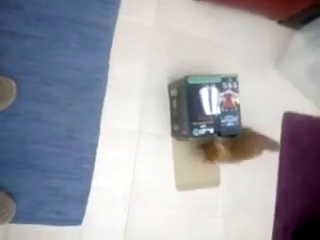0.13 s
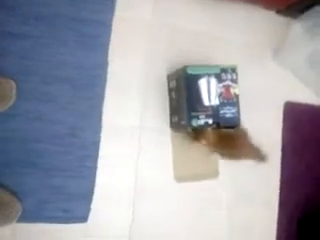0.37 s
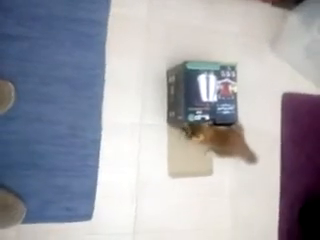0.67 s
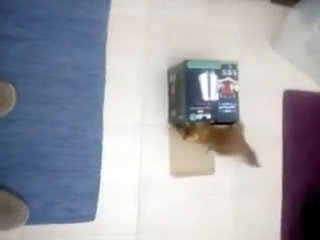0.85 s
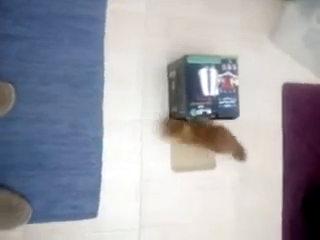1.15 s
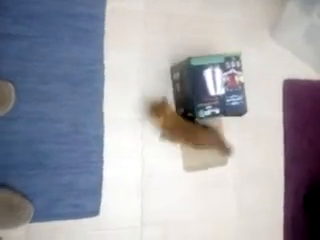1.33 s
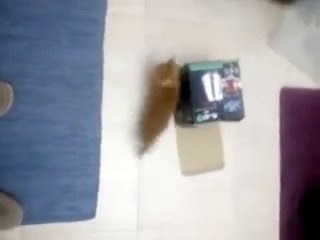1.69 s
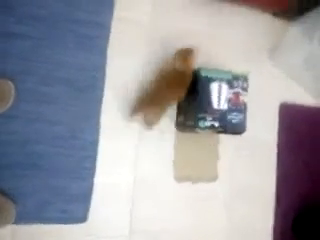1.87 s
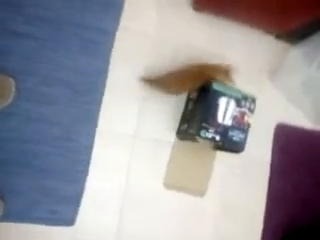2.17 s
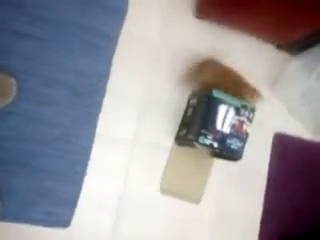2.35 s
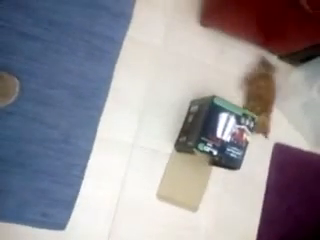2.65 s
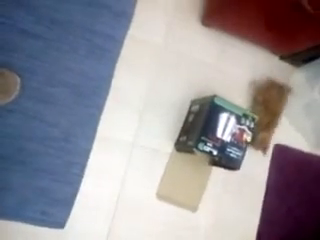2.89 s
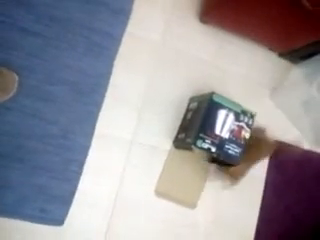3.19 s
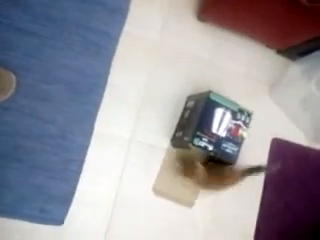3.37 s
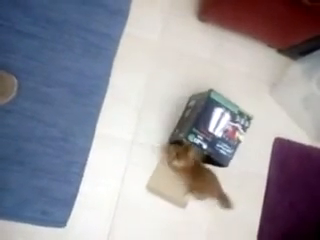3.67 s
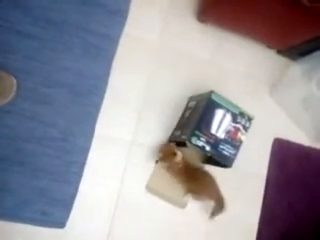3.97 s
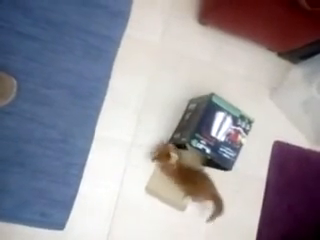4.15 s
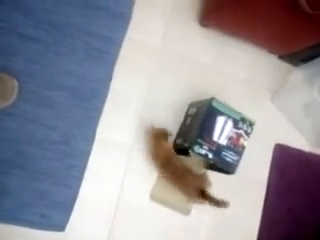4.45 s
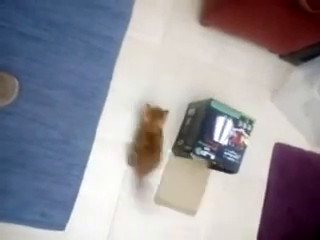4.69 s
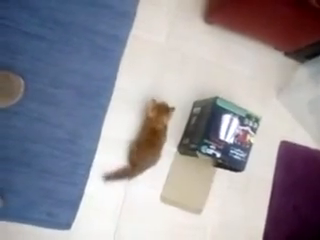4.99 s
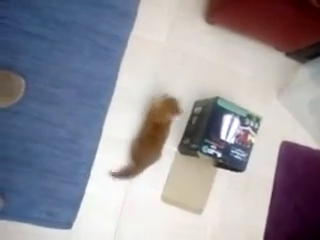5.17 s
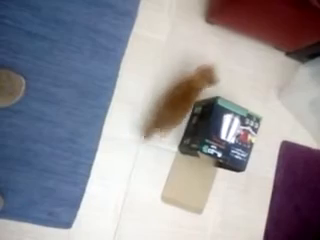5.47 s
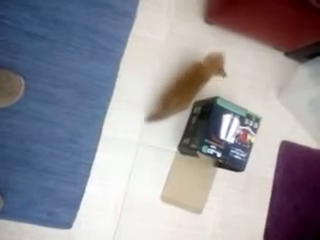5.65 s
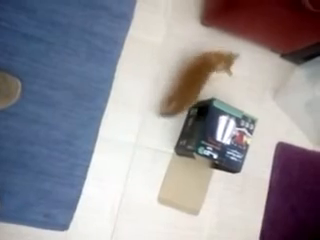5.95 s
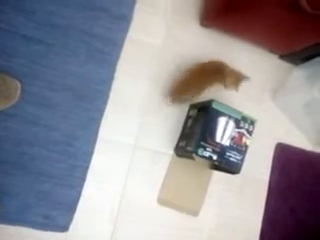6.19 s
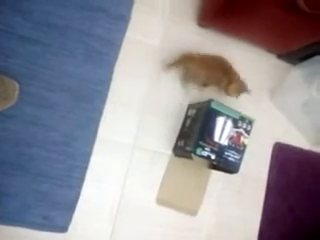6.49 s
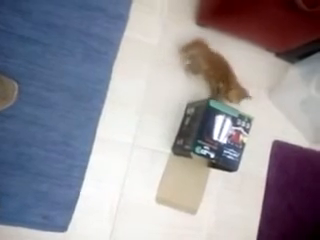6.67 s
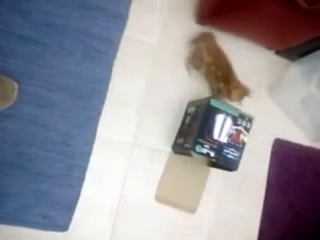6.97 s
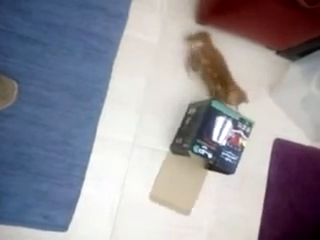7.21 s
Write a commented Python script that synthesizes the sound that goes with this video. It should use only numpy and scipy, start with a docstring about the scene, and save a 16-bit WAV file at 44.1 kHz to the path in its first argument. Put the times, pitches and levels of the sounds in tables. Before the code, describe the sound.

In a quiet tiled room, a kitten bats a hollow cardboard box: soft thumps, sharp claw ticks and papery scrapes for about two seconds. A faint rustle passes on the left, then near-silence, then a dense, louder flurry of knocks and scratches, followed by looser taps. After another pause come two short final bursts. A hand-held microphone a short way above catches low hum, faint hiss and slight room echoes.

```python
"""A kitten circles a cardboard box on a tiled floor, a short way below a hand-held camera; the room hums quietly.
For two seconds paws thump the panels, claws tick and knock the edges, and card and fur scrape along.
A soft rustle passes on the left, then come a dense flurry and a looser one, a pause, and two last short bursts.
Blows ring modes of the box, strokes are dense random slips, and hum, rustle and hiss are shaped noise.
Sparse echoes from tiles and walls follow the box."""
import sys
import numpy as np
from scipy import signal
from scipy.fft import rfft, irfft, next_fast_len
from scipy.io import wavfile
from scipy.ndimage import uniform_filter1d

SR = 44100
rng = np.random.default_rng(int(sys.argv[2]) if len(sys.argv) > 2 else 0)


def store_wav(level_fs):
    """Save 16-bit WAV to argv[1]."""
    pcm = np.round(np.clip(np.atleast_2d(level_fs), -1, 1) * 32767)
    wavfile.write(sys.argv[1], SR, pcm.T.astype(np.int16))


N = 323253  # length in samples

# Spectrum of card, fur and paw friction: hz, level_db (per Hz, relative)
FRICTION_SPECTRUM = [(410, -0.5), (700, -3.5), (954, 3), (1070, 6.5), (1300, 4.5), (1770, 2.5), (2190, 8),
                     (2920, 4.5), (4750, 2.5), (6020, 1), (8010, -8.5), (12000, -14.5), (15600, -68),
                     (22000, -120)]
# Modes of the box, from deep boom over panels to stiff edges:
# hz, level_db (relative), t60_s (before damping), gain_db (added in full when the box stands free)
BOX_MODES = [(112, -11, 0.2, -5), (129.1, 1, 0.31, -3), (150.4, -0.5, 0.15, -7), (182, -1, 0.38, -3),
             (229.3, 4, 0.17, 5), (246.2, -1, 0.1, 2), (302, -4.5, 0.096, -7), (346, 4.5, 0.14, 4),
             (370.6, 1, 0.18, -1.5), (401.4, 0.5, 0.16, -8), (429, -2, 0.11, 0), (455.8, 6.5, 0.14, -2),
             (486, -5.5, 0.06, 2), (567, 0, 0.084, 4), (670, -7, 0.031, -8), (750.3, -6, 0.023, -12),
             (850, -9, 0.1, -5), (928, 2.5, 0.065, -19.5), (1043, -4, 0.13, 2), (1200, 2.5, 0.043, -3),
             (1450, 2.5, 0.049, -0.5), (1645, 3, 0.045, -5), (1864, 2.5, 0.053, -7.5),
             (1987, 0, 0.062, -13), (2144, 4.5, 0.053, 2.5), (2417, 7, 0.036, -3), (2748, 10, 0.035, -3.5),
             (3070, -3.5, 0.075, 11), (3796, 12.5, 0.04, -3), (4340, 18, 0.04, -12), (4700, 17, 0.035, -2)]
PANELS_FROM_HZ, EDGES_FROM_HZ = 250, 750


def gain_of(db):
    """Turns decibels into an amplitude factor."""
    return 10 ** (np.asarray(db) / 20)


def evened(x):
    """Scales a signal to an RMS of one."""
    return x / np.sqrt(np.mean(x ** 2) + 1e-20)


def read(points, hz):
    """Reads a curve between its points, along a logarithmic frequency axis."""
    point_hz, value = np.transpose(points)
    return np.interp(np.log(hz + 1), np.log(point_hz + 1), value)


def coloured(x, points, tilt_db=0):
    """Gives x a spectrum, leaned around 3.5 kHz by tilt_db per octave, at an RMS of one."""
    hz = np.fft.rfftfreq(len(x), 1 / SR)
    lean_db = tilt_db * np.log2((hz + 100) / 3500)
    return evened(irfft(rfft(x) * gain_of(read(points, hz) + lean_db), len(x)))


def hum():
    """Room tone and microphone hiss: random short-time spectra with faint drifting patches."""
    # Room tone and hiss: hz, level_db (per Hz, relative)
    hum_spectrum = [(32, -54), (55, 7.5), (119, 1), (144, -18), (174, -2.5), (344, -8.5), (474, -7),
                    (528, -11), (667, -11.5), (742, -12), (9000, -24.5), (11700, -82), (19800, -120)]
    # Likeness of the two ports: hz, left_right_likeness (-1 to 1)
    hum_likeness = [(60, 0.93), (180, 0.39), (550, 0.37), (1650, -0.35), (4970, -0.034), (15000, 0.15)]
    level_db, patch_db = -58, .9
    frames, hz = N // 256 + 5, np.fft.rfftfreq(1024, 1 / SR)
    a, b, c, d, patches = rng.standard_normal((frames, 513, 5)).T
    patches = uniform_filter1d(patches, 12, 0)  # smooth across frequency
    patches = evened(uniform_filter1d(patches, 14, 1))  # smooth along time
    same = read(hum_likeness, hz)[:, None]
    left = a + 1j * b
    right = same * left + np.sqrt(1 - same ** 2) * (c + 1j * d)
    spectra = np.array([left, right]) * gain_of(read(hum_spectrum, hz)[:, None] + patch_db * patches)
    noise = signal.istft(spectra, nperseg=1024, noverlap=768)[1][:, :N]
    return gain_of(level_db) * evened(noise)


def rustle():
    """A soft wide rustle from the left, like a shoe shifting on a rug: fibre noise partly alike in both ports."""
    # Swell and fade of the rustle: time_s, level_db (before panning)
    rustle_envelope = [(2.09, -66), (2.11, -59), (2.162, -51), (2.43, -50), (2.554, -64.5), (2.56, -80)]
    # Colour of the fibre noise: hz, level_db (per Hz, relative)
    rustle_spectrum = [(150, -16), (400, 2.5), (750, -1), (1200, -10.5), (2600, -10.5), (4500, -12.5),
                       (6500, -14.5), (9000, -14.5), (13000, 4.5), (15000, -20)]
    pan_db, same = 3, .48  # left against right; share of power common to both ports
    s, db = np.transpose(rustle_envelope)
    t = np.arange(N) / SR
    shared, left, right = (coloured(noise, rustle_spectrum) for noise in rng.standard_normal((3, N)))
    ports = np.sqrt(same) * shared + np.sqrt(1 - same) * np.array([left, right])
    return ports * gain_of(np.interp(t, s, db, -120, -120) + pan_db * np.array([[.5], [-.5]]))


def room(x):
    """Sparse echoes of random sign from tiles and walls, each band dying at its own speed."""
    # Decay of the room: hz, t60_s, level_db (relative)
    room_decay = [(100, 0.34, -6), (400, 0.28, -6.5), (990, 0.28, 0.5), (2200, 0.21, -1), (4500, 0.1, -2),
                  (9000, 0.19, 0.5)]
    taps = np.zeros((2, SR // 2))
    slots = np.arange(200, SR // 2 - 20, 20)
    at = slots + rng.integers(0, 20, (2, len(slots)))  # one echo somewhere in each slot
    np.put_along_axis(taps, at, rng.choice([-1., 1.], at.shape), 1)
    hz, t, z = signal.stft(taps, SR, nperseg=256)
    same = 1 / (1 + (hz[:, None] / 500) ** 4)  # long waves reach both ports alike
    z = np.array([z[0], same * z[0] + np.sqrt(1 - same ** 2) * z[1]])
    t60, db = (read(np.array(room_decay)[:, [0, k]], hz)[:, None] for k in (1, 2))
    tail = signal.istft(z * gain_of(db - 60 * t / t60), SR, nperseg=256)[1]
    tail = tail / np.linalg.norm(tail[0])
    return signal.fftconvolve(x[1:], tail, axes=1)[:, :N]  # fed by the right port


def place(x):
    """Two microphone ports: the camera body colours both and shifts the phase of the left one."""
    # How the ports hear the box: hz, right_db, left_db (against right), left_lead_radians
    port_response = [(100, -8.5, -1, 0.25), (423, 0, 2.5, 0.62), (774, 3, 1, -1.5), (1250, -2, -10.5, -1.5),
                     (1540, -0.1, -10.5, -0.5), (1950, -3.5, 4.5, -1), (2690, 0, -7.5, -2),
                     (3400, 1, -1, -0.5), (3516, 5, -16, -4), (5000, 3.5, -2, -6), (5340, 6, -9, -7.5),
                     (6700, -3, 8.5, -6.5), (8000, -7, 10, -6)]
    size = next_fast_len(N + 4096)
    hz = np.fft.rfftfreq(size, 1 / SR)
    port_hz, right_db, left_db, lead = np.transpose(port_response)
    left, right = rfft(x, size) * gain_of(np.interp(hz, port_hz, right_db))
    left = left * gain_of(np.interp(hz, port_hz, left_db))
    left = left * np.exp(1j * np.interp(hz, port_hz, lead))
    return irfft(np.array([left, right]), size)[:, :N]


def kitten(s):
    """Delay, balance and freedom of the box at one moment, read along the kitten's path."""
    # The path: time_s, left_delay_ms (extra), pan_db (left against right), box_freedom (0-1)
    kitten_path = [(0.1, 0.02, 0.5, 0.66), (0.28, 0.022, 1, 0), (0.45, 0.025, -1.2, 0),
                   (0.82, 0.014, 0.5, 0), (1.2, 0.034, -0.2, 0.26), (1.8, -0.0066, -0.1, 0.5),
                   (3.17, 0.027, 0, 0.26), (3.25, -0.011, -1.3, 0), (3.45, 0.033, -1, 0),
                   (3.52, 0.026, -0.3, 0.08), (3.8, 0.017, 0.5, 0.43), (4.25, 0.0092, -0.5, 0.06),
                   (4.62, -0.014, 1.5, 0.2), (6.62, 0.085, 3.2, 0.73), (6.95, 0.019, -0.3, 0.6),
                   (7.28, 0.033, -0.3, 1)]
    times, *columns = np.transpose(kitten_path)
    return [np.interp(s, times, column) for column in columns]


def add(mix, s, sound):
    """Lays a sound into both ports from where the kitten is."""
    delay_ms, pan_db, _ = kitten(s)
    taps = np.arange(-16, 17)
    shift = np.sinc(taps - delay_ms * SR / 1000) * np.hanning(len(taps))  # delay by part of a sample
    left = gain_of(pan_db) * np.convolve(sound, shift, "same")
    part = mix[:, round(s * SR):][:, :len(sound)]
    part += np.array([left, sound])[:, :part.shape[1]]


def ring(modes, weights_db, damping=1):
    """The response of a set of modes to one tap: decaying sines, dying faster with more damping."""
    hz, db, t60 = np.transpose(modes)[:3, :, None]
    t = np.arange(SR // 4) / SR
    # the broad panels start off together; neighbouring stiff modes swing in opposite senses
    signs = np.where(hz > EDGES_FROM_HZ, (-1.) ** np.arange(len(modes))[:, None], 1)
    level_db = db + weights_db[:, None] - 60 * damping * t / t60
    return (signs * gain_of(level_db) * np.sin(2 * np.pi * hz * t)).sum(0)


def stroke(row, chance):
    """Dense slips of uneven size swell, hold and fade: their rasp, the edges singing, the panels rumbling."""
    swell_span_db, rumble_follows = 20, .7  # span of swell and fade; share of it the rumble follows
    s, swell_ms, hold_ms, fade_ms, rasp_db, rumble_db, tilt_db, edge_db, edge_hz = row
    start = max(s - 1.5 * swell_ms / 1000, 0)
    t_ms = (start - s + np.arange(len(chance[0])) / SR) * 1000  # zero at full strength
    swell, fade = t_ms / swell_ms, (hold_ms - t_ms) / fade_ms
    shape_db = swell_span_db * np.minimum(np.minimum(swell, fade), 0)
    size, clumps, drag, big, when = chance

    slips = size * gain_of(0.54 * big ** 2) * (abs(when) < .2)
    slips *= gain_of(1.64 * evened(uniform_filter1d(clumps, 250)))  # slips come in clumps
    rasp = coloured(slips, FRICTION_SPECTRUM, tilt_db) * gain_of(rasp_db + shape_db)

    low = [m for m in BOX_MODES if m[0] < EDGES_FROM_HZ]
    body = ring(low, np.zeros(len(low)))
    drag = drag * gain_of(rumble_db + rumble_follows * shape_db)
    out = signal.fftconvolve(drag, body / np.linalg.norm(body))

    edges = [m for m in BOX_MODES if m[0] > EDGES_FROM_HZ]
    octaves_off = np.log2(np.transpose(edges)[0] / edge_hz)
    edge = ring(edges, -30 * octaves_off ** 2, 2.5)
    catches = evened(clumps * gain_of(1.6 * size ** 2) * (abs(big) < .05)) * gain_of(edge_db + shape_db)
    out += signal.fftconvolve(catches, edge / np.linalg.norm(edge))  # sparse catches ring the edges
    out[:len(t_ms)] += rasp
    return start, out


def blow(row, chance):
    """A contact builds up, snaps the claw and drives three families of box modes; the paw scuffs on for a moment."""
    # The claw: hz, level_db (relative), t60_s (before damping)
    claw_modes = [(2234, -18, 0.03), (2970, -6, 0.0067), (4060, -33, 0.00058), (4065, 1, 0.0062),
                  (5300, 7.5, 0.0013), (6500, -3.5, 0.0057)]
    rise_ms, detune, luck_spread_db = 1.212, .018, 1.6
    s, tick_db, deep_db, panel_db, edge_db, deep_hz, panel_hz, edge_hz, scuff_db, damping, narrow_db = row
    t_ms = np.arange(3000) / SR * 1000
    free = kitten(s)[2]
    # the leaning kitten bends the card, so each mode strays from blow to blow
    box = [(hz * (1 + detune * (1 - free) * bend), db + free * free_db, t60)
           for (hz, db, t60, free_db), bend in zip(BOX_MODES, np.clip(chance[0, ::-1], -2, 2))]
    deep = [m for m in box if m[0] < PANELS_FROM_HZ]
    edges = [m for m in box if m[0] > EDGES_FROM_HZ]
    panels = box[len(deep):-len(edges)]

    scuff_ms = 18.3 * .5 ** ((scuff_db + 45) / 7)  # a scuff 7 dB louder dies in half the time
    scuff = np.minimum(t_ms / rise_ms, 1) ** 2 * np.exp(-t_ms / scuff_ms)
    out = np.zeros(SR // 4 + len(t_ms) - 1)
    out[:len(t_ms)] = gain_of(scuff_db) * coloured(chance[4, 20:], FRICTION_SPECTRUM) * scuff

    # (modes, dB, favoured Hz, dB lost an octave away, softness of the push ms, rattle ms, rattle share)
    families = [(claw_modes, tick_db, 4300, 0, .03, .8, .05),
                (deep, deep_db, deep_hz, 60, 1.1, 8.5, .04),
                (panels, panel_db, panel_hz, 30, .6, 8.5, .05),
                (edges, edge_db, edge_hz, narrow_db, .05, 5, .012)]
    for k, (modes, db, spot_hz, spot_db, soft_ms, rattle_ms, share) in enumerate(families):
        luck_db = luck_spread_db * chance[k, :len(modes)]
        weights_db = luck_db - spot_db * np.log2(np.transpose(modes)[0] / spot_hz) ** 2
        slope_ms = np.where(t_ms < rise_ms, rise_ms / 2, rattle_ms)  # build-up, then decay
        rattle = share * chance[k, 20:] * np.exp(-np.abs(t_ms - rise_ms) / slope_ms)
        push = np.sinc((t_ms - rise_ms) * SR / 1000) + rattle  # one snap amid the rattle
        pad = np.exp(-t_ms[:400] / soft_ms) * t_ms[:400]  # the paw pad rounds the push
        push = np.convolve(push, pad)[:len(t_ms)]
        sound = signal.fftconvolve(ring(modes, weights_db, max(damping, .3)), push)
        out += gain_of(db) * sound / abs(sound).max()
    return s, out


def scene():
    """The kitten's blows and strokes on the box, their echoes in the room, the rustle and the hum."""
    # Blows: start_s, tick_db, deep_db, panel_db, edge_db, then the pitches favoured by the spot struck:
    # deep_hz, panel_hz, edge_hz; scuff_db, damping (resting paw, factor on decay speed, at least 0.3 is used),
    # narrow_db (edge modes' loss an octave from the spot)
    blow_list = [(0.1317, -60, -46, -33.5, -37, 229, 480, 1110, -53, 0.73, 25),
                 (0.136, -35, -62, -38, -45, 229, 472, 3880, -58, 1.4, 23),
                 (0.142, -55, -39.5, -32, -35.5, 120, 476, 1800, -62, 0.68, 31),
                 (0.2254, -39, -42.5, -71, -39.5, 114.5, 433, 2120, -51, 0.89, 46),
                 (0.259, -59, -64, -68, -42, 108, 299, 2100, -55, 1.1, 60),
                 (0.2733, -14, -71, -35, -31.5, 102, 450, 1980, -34, 0.86, 39),
                 (0.43, -31, -57, -51, -33, 104, 353, 2360, -42, 2.4, 36),
                 (0.82, -18.5, -68, -44, -58, 225, 296, 2260, -35, 1.5, 13),
                 (0.8316, -51, -25.5, -34.5, -33, 132, 383, 2500, -44, 0.79, 25),
                 (0.85, -62, -49, -40, -45, 130, 352, 2500, -50, 1.1, 17),
                 (0.871, -70, -36, -51, -63, 131, 350, 2500, -70, 0.76, 15),
                 (1.2295, -53, -28, -24.5, -64, 133, 380, 2540, -52, 0.74, 7),
                 (1.2461, -59, -31.5, -24.5, -52, 193, 348, 1140, -63, 1.2, 11),
                 (1.257, -60, -36, -31.5, -60, 140, 456, 1140, -62, 1.7, 11),
                 (1.2634, -49, -45, -61, -38, 110, 415, 2840, -60, 1.2, 29),
                 (1.2923, -72, -47, -31.5, -67, 128, 390, 1040, -67, 0.91, 9),
                 (1.725, -57, -36, -41, -51, 135, 450, 1090, -54.5, 1.1, 22),
                 (1.9272, -65, -41, -61, -46.5, 126, 452, 1240, -59, 1.1, 28),
                 (3.152, -70, -27, -29.5, -75, 151, 298, 902, -65, 2.7, 9),
                 (3.163, -70, -21, -32.5, -47, 156, 300, 902, -72, 0.71, 4),
                 (3.1709, -50, -31, -27, -28.5, 138.5, 330, 1700, -48, 1.3, 28),
                 (3.1832, -33, -31, -25, -39, 134, 410, 2060, -42, 1.16, 32),
                 (3.2185, -18.5, -36, -45, -18, 152.6, 406, 2030, -40, 2.3, 21),
                 (3.228, -29, -40, -32.5, -21, 121, 447, 2840, -55, 0.89, 44),
                 (3.2329, -26, -60, -46, -23.5, 121, 447, 3900, -45, 0.91, 12),
                 (3.244, -36, -60, -54, -38, 121, 447, 1900, -52, 1.3, 15),
                 (3.2521, -41, -60, -47, -36, 121, 447, 4270, -45, 1.4, 15),
                 (3.2595, -36, -37, -40, -26, 111, 328, 2820, -57, 1.3, 27),
                 (3.2638, -41, -60, -45, -32, 112, 328, 4270, -62, 1.3, 15),
                 (3.282, -42, -60, -47, -40, 112, 328, 2300, -55, 1, 23),
                 (3.2955, -44, -60, -42, -43, 112, 328, 4760, -55, 1.2, 30),
                 (3.305, -31.5, -43, -45, -69, 108, 460, 2130, -49, 0.25, 9),
                 (3.345, -37, -70, -45, -42, 110, 474, 2020, -58, 1.2, 10),
                 (3.3627, -34, -70, -50, -35, 110, 474, 2200, -53, 1.2, 15),
                 (3.45, -49, -56, -46, -44, 106, 335, 2400, -38, 1.6, 14),
                 (3.454, -25.5, -35, -35, -18, 106, 436, 2250, -48, 5.4, 27),
                 (3.462, -58, -36, -30.5, -39, 105, 453, 1080, -60, 0.77, 25),
                 (3.5015, -26.5, -45, -26, -27.5, 229, 660, 890, -40, 1.07, 24),
                 (3.5058, -22, -42, -43, -24, 119, 565, 1530, -45, 1.8, 21),
                 (3.5129, -51, -50, -31, -32, 180, 474, 950, -62, 2.2, 19),
                 (3.523, -59, -40, -32, -36, 181, 480, 960, -52, 1.5, 30),
                 (3.6757, -40, -74, -66, -48, 166, 474, 1470, -54, 0.82, 11),
                 (3.7451, -52, -38.5, -38, -41, 136.7, 450, 2100, -60, 0.66, 12),
                 (3.7679, -61, -37, -37.5, -51, 186, 350, 990, -63, 1.6, 11),
                 (3.812, -44, -39, -57, -39.5, 177, 374, 1330, -75, 1.1, 22),
                 (4.1465, -48, -76, -46, -52, 104.4, 526, 1954, -62, 0.42, 14),
                 (4.2053, -41, -29, -37, -45.5, 124, 400, 1180, -60, 0.38, 12),
                 (4.22, -60, -46, -39.5, -55, 185, 350, 1180, -65, 0.52, 9),
                 (4.2485, -36, -40, -35, -43, 110, 395, 2180, -43, 0.64, 26),
                 (4.255, -36, -60, -53, -50, 110, 480, 4760, -51, 1.1, 20),
                 (4.26, -41, -60, -41, -55, 110, 480, 860, -71, 0.68, 40),
                 (4.275, -55, -60, -45, -60, 110, 385, 860, -60, 1.2, 40),
                 (4.312, -44, -50, -47, -52, 108, 369, 2600, -63, 1.2, 15),
                 (4.355, -48, -30.5, -39, -67, 128, 366, 2440, -52.5, 1, 9),
                 (4.4122, -46, -38.5, -76, -63, 125, 493, 2160, -55, 1.4, 9),
                 (4.468, -60, -60, -45.5, -65, 120, 493, 1100, -69, 1.25, 9),
                 (4.621, -58, -35, -48, -69, 252, 298, 1100, -75, 2.6, 9),
                 (4.633, -62, -41, -51, -69, 200, 298, 1100, -70, 1.4, 9),
                 (4.665, -65, -41, -52, -71, 200, 296, 1100, -75, 1, 9),
                 (6.6148, -61, -62, -44, -54, 227, 400, 1370, -42, 0.93, 9),
                 (6.6173, -53, -73, -41, -19.5, 137, 410, 1470, -40, 2.6, 18),
                 (6.6195, -60, -75, -43, -24, 137, 410, 2140, -58, 1.1, 35),
                 (6.632, -59, -72, -39.5, -44, 178, 405, 2140, -42, 0.5, 16),
                 (6.639, -47, -69, -38, -37, 178, 417, 3880, -68, 1.2, 30),
                 (6.648, -55, -69, -40, -43, 178, 417, 1450, -65, 2.2, 30),
                 (7.276, -57, -72, -41, -23, 130, 485, 1494, -56, 0.79, 8.5),
                 (7.2823, -54, -67, -29.5, -44, 188, 302, 1040, -59, 0.25, 11),
                 (7.293, -57, -67, -45, -32, 110, 345, 1640, -54, 1, 18),
                 (7.306, -50, -67, -29, -32, 110, 327, 1080, -49, 0.82, 7),
                 (7.324, -48, -67, -45, -48, 110, 327, 4600, -52, 0.9, 20)]
    # Strokes: full_strength_s, swell_ms, hold_ms, fade_ms, rasp_db, rumble_db (in the panels),
    # tilt_db (brightness per octave), edge_db (edges set singing), edge_hz (favoured)
    stroke_list = [(0.0, 3.8, 2.7, 79, -54, -73, -3, -61, 2000),
                   (0.29, 11.3, 5.7, 84, -47, -48.5, 5, -49, 2090),
                   (0.322, 30.4, 78, 92, -53, -72, 1.5, -60, 2080),
                   (0.449, 10.4, 4.2, 32, -49, -51, 2, -62, 2100),
                   (0.47, 20.3, 49, 83, -58.5, -76, 1.5, -67, 2100),
                   (0.633, 63, 30, 99, -54, -88, 1, -53.5, 2170),
                   (0.86, 8.7, 10, 160, -63, -66, 1, -56, 2510),
                   (0.964, 60, 3.5, 36, -61.5, -61, 3, -68, 2100),
                   (1.035, 58, 4.7, 42, -55, -58.5, -0.5, -60, 2490),
                   (1.15, 72, 69, 58, -49.5, -55, 2, -56, 2180),
                   (1.355, 47, 3.7, 65, -57, -59, -5, -74, 2100),
                   (1.41, 12.6, 43, 90, -61.5, -63, -2.5, -81, 2100),
                   (1.734, 58, 38, 220, -57, -57, 1.5, -65, 2000),
                   (1.83, 76, 86, 85, -58, -65, -1, -69, 2100),
                   (1.96, 64, 50, 180, -60.5, -62.5, 1.5, -73, 2100),
                   (3.222, 5.25, 4.6, 25, -34.5, -59, 1, -35.5, 1900),
                   (3.272, 10.6, 4, 46, -54, -56, 2, -43, 2130),
                   (3.309, 25, 3.1, 53, -46, -49, 0, -49, 2120),
                   (3.358, 60, 1.2, 100, -46, -48.5, 3.5, -45, 2210),
                   (3.47, 9.9, 34, 50, -47, -41, -5.5, -52, 1860),
                   (3.548, 50, 6.1, 36, -37.5, -69, -3.5, -62, 1000),
                   (3.585, 19.5, 22, 200, -54.5, -73, -2, -66, 1500),
                   (3.672, 21, 8.6, 60, -50.5, -55.5, 0, -56, 1880),
                   (3.747, 49, 4.5, 63, -52.5, -65, -4, -64, 1900),
                   (3.814, 78, 3.3, 123, -53.5, -53, -1.5, -55, 1450),
                   (4.074, 60, 4.8, 52, -54.5, -56.5, -0.5, -57, 2090),
                   (4.265, 6, 3.6, 30, -46, -45.5, 37, -52, 2300),
                   (4.3, 19.5, 7, 95, -48.5, -68, 3.5, -50.5, 2610),
                   (4.399, 117, 27, 73, -55.5, -59.5, 6.5, -66, 2260),
                   (6.638, 5, 1.9, 82, -45, -64, -1, -53.5, 1500),
                   (6.948, 32.4, 13, 68, -52, -61, 0.5, -54.5, 1850),
                   (7.005, 60, 17, 97, -56.5, -63.5, 1, -66, 2150)]
    radiates_from_hz = 105  # the box is too small to push out longer waves
    room_db, room_pan_db = -8, 1.4  # echo level; left against right
    box = np.zeros((2, N))
    for row, chance in zip(blow_list, rng.standard_normal((len(blow_list), 5, 3020))):
        add(box, *blow(row, chance))
    for row, chance in zip(stroke_list, rng.standard_normal((len(stroke_list), 5, 24576))):
        add(box, *stroke(row, chance))
    radiation = signal.butter(3, radiates_from_hz, "highpass", fs=SR, output="sos")
    box = signal.sosfilt(radiation, place(box))
    echoes = gain_of(room_db + room_pan_db * np.array([[.5], [-.5]])) * room(box)
    return box + echoes + rustle() + hum()


def record(dry):
    """The microphone loses deep bass and high treble; the electronics add noise; then the band limit."""
    # Electronic rumble and hiss: hz, level_db (per Hz, relative)
    electronics_spectrum = [(20, 10), (42, 3), (55, -10), (200, -93), (7000, -91), (9000, -14.5),
                            (13500, -20.5), (14700, -6.5), (15500, -7)]
    mic_low_hz, mic_high_hz, band_edge_hz, noise_db = 60, 7060, 15600, -67
    heard = signal.sosfilt(signal.butter(6, mic_low_hz, "highpass", fs=SR, output="sos"), dry)
    heard = signal.sosfilt(signal.butter(4, mic_high_hz, fs=SR, output="sos"), heard)
    hiss = [coloured(noise, electronics_spectrum) for noise in rng.standard_normal((2, N))]
    heard = heard + gain_of(noise_db) * np.array(hiss)
    band_limit = signal.firwin(511, band_edge_hz, window=("kaiser", 9), fs=SR)
    return signal.oaconvolve(heard, band_limit[None], "same")


dry = scene()
out = record(dry)
store_wav(out)
```